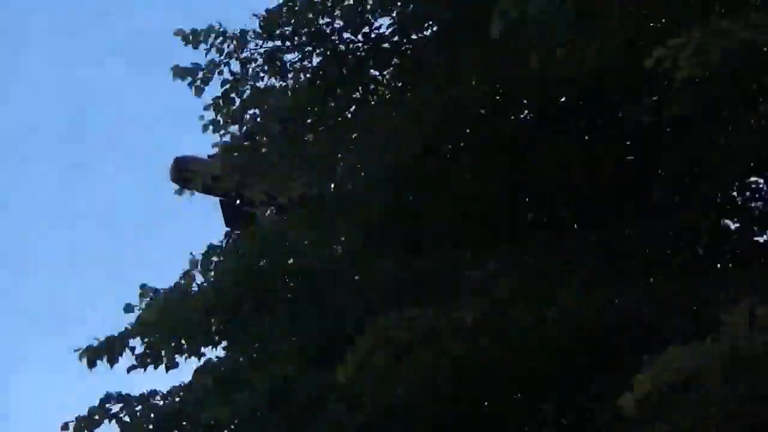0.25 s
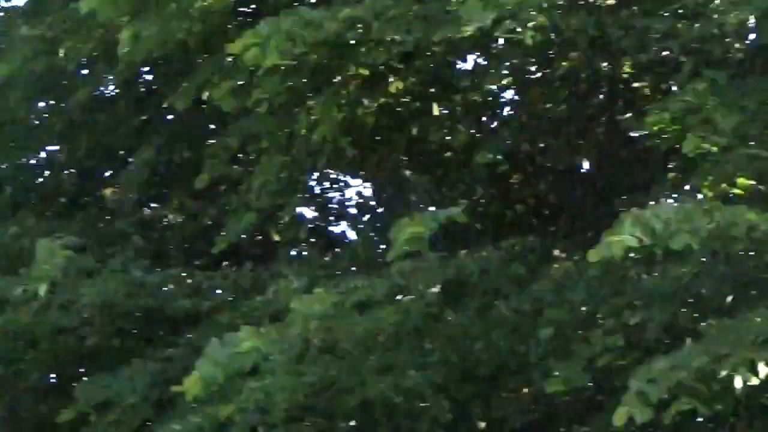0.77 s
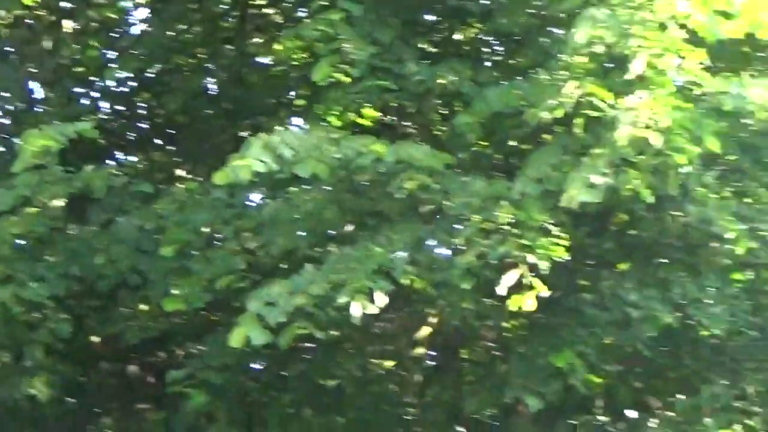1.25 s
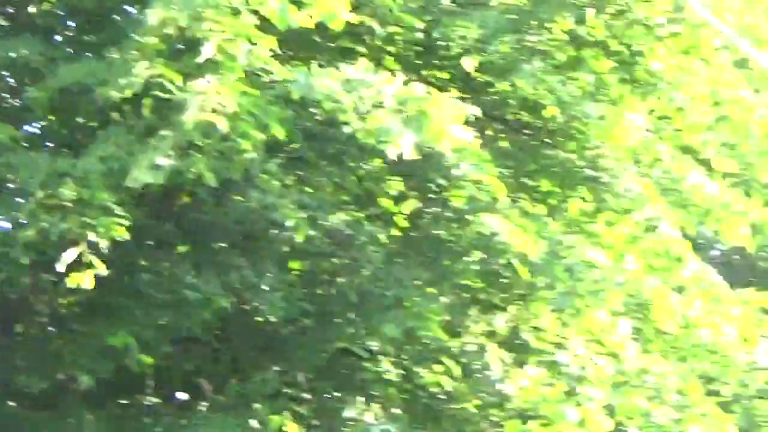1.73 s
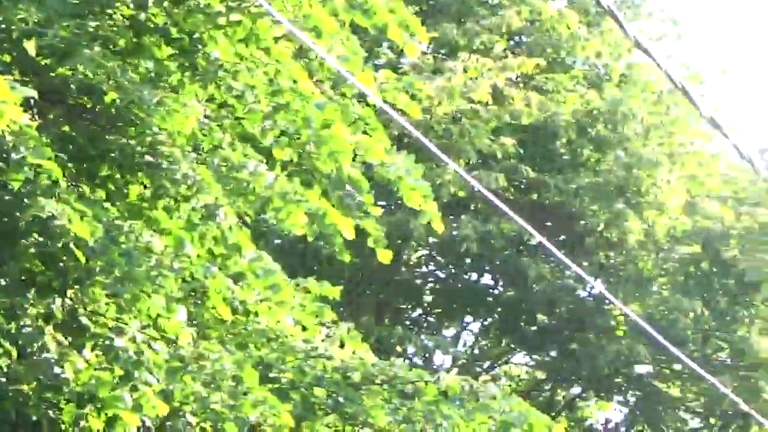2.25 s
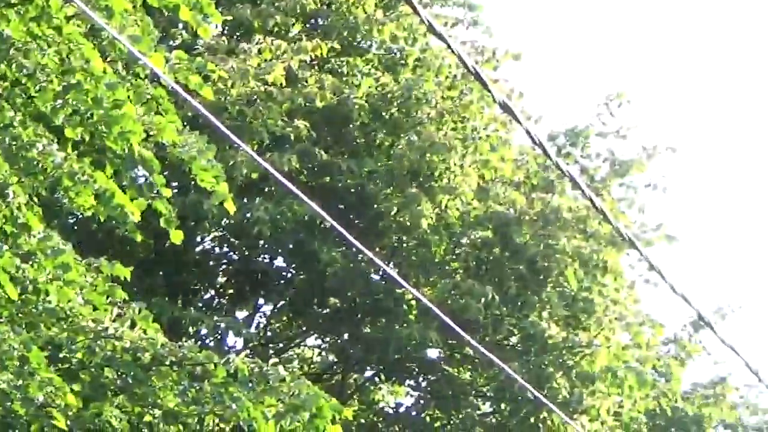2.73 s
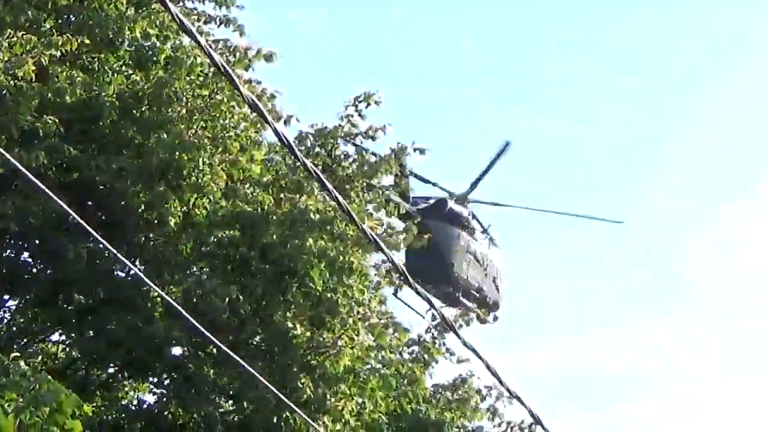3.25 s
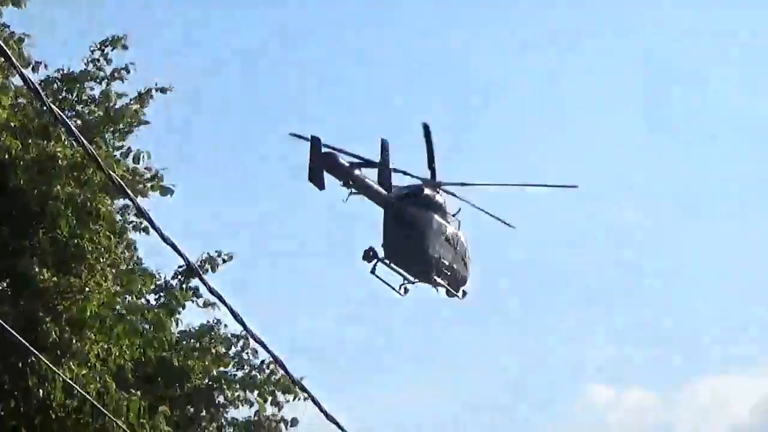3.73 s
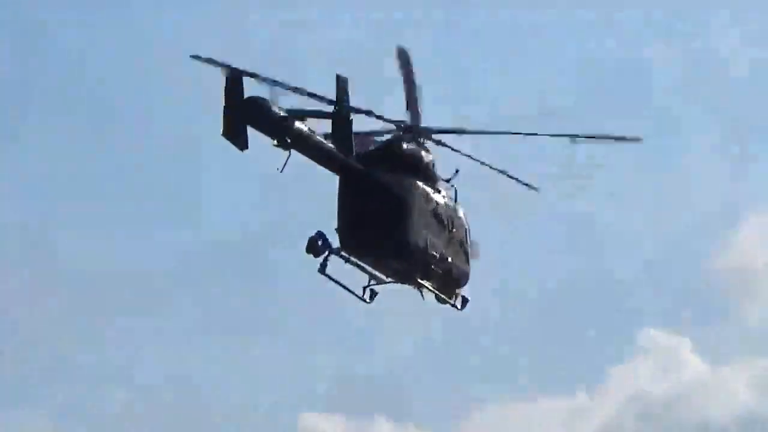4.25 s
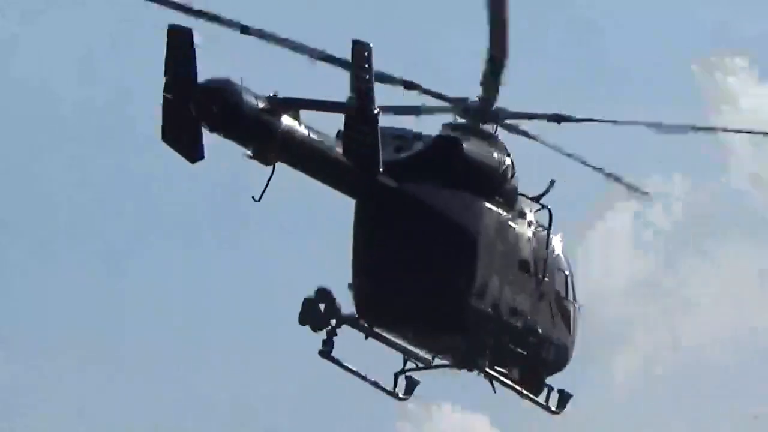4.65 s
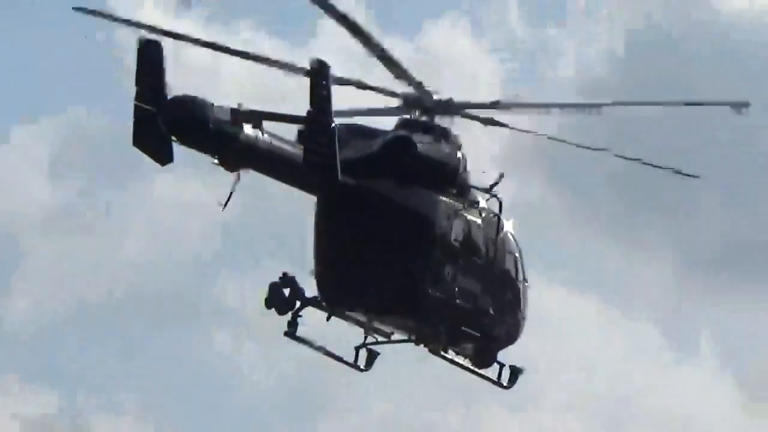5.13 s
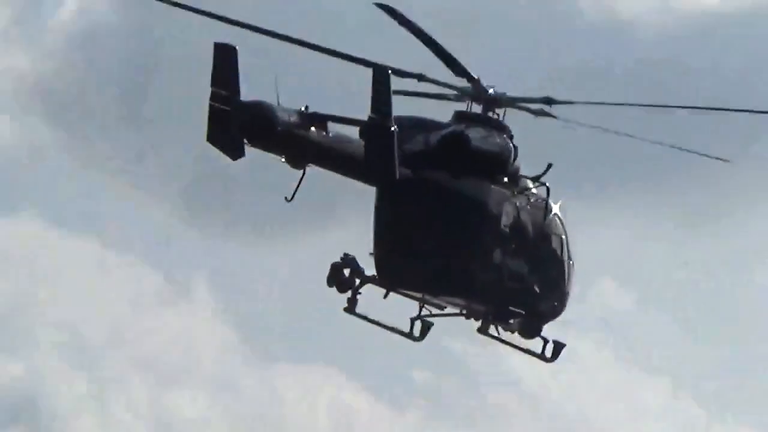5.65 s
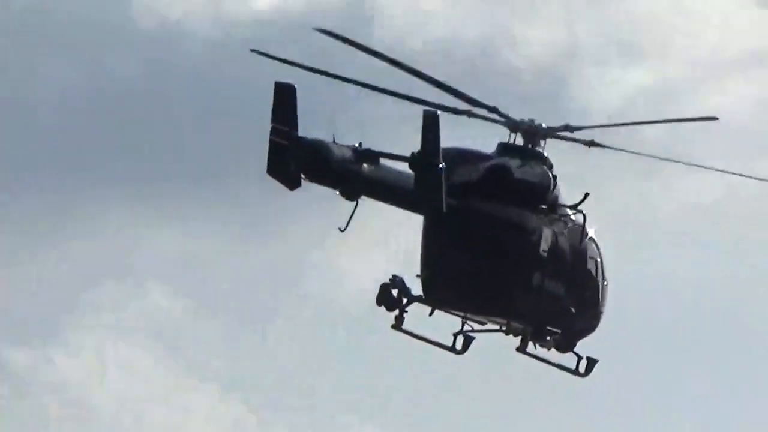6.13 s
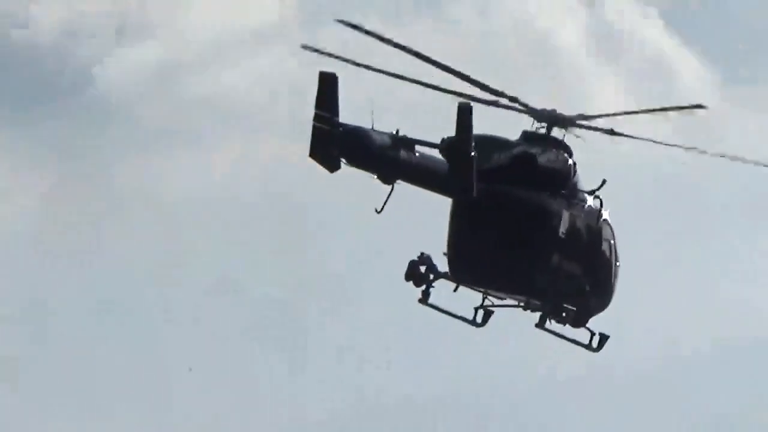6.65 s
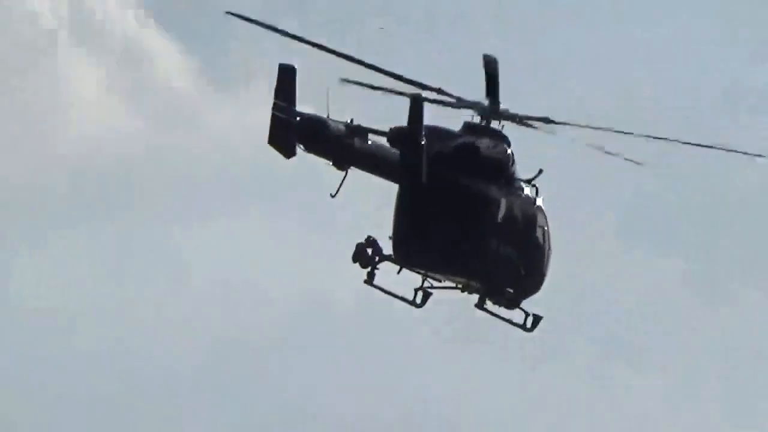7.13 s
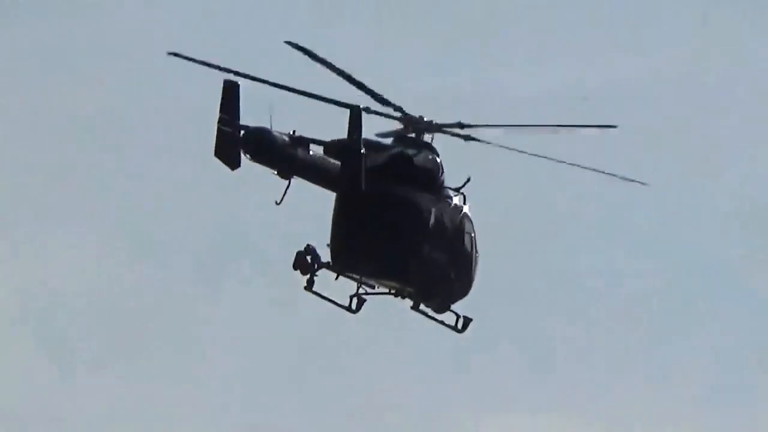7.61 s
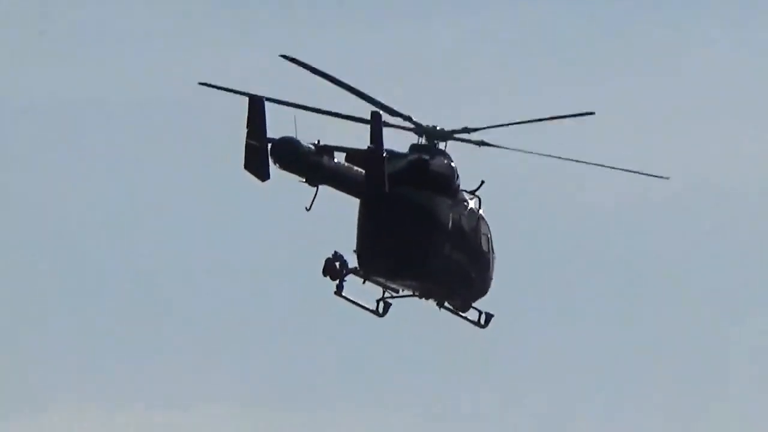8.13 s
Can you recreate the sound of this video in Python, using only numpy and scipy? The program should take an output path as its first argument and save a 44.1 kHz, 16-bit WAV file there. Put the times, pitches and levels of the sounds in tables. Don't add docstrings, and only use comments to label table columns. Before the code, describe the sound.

Outdoors, a small handheld stereo camera catches a departing helicopter. A sharp hiss at once dulls behind trees, leaving a rushing midrange roar with fast blade throb and a slowly sinking, flickering whine. Hiss and a faint whistle open up near four seconds. The roar then drops away, lingering softly among houses, while the whine twinkles in and out to the end.

```python
import sys
import numpy as np
from scipy import signal
from scipy.fft import rfft, irfft, next_fast_len
from scipy.io import wavfile
from scipy.ndimage import uniform_filter1d

SR = 44100
rng = np.random.default_rng(int(sys.argv[2]) if len(sys.argv) > 2 else 0)


def int16_out(signal):
    q = np.round(np.clip(np.atleast_2d(signal).T, -1, 1) * 32767)
    wavfile.write(sys.argv[1], SR, q.astype(np.int16))


def volts_from_decibels(level):
    exponent = np.asarray(level, float) / 20
    return 10 ** exponent


N = 369116
TIME = np.arange(N) / SR
SIZE = next_fast_len(N)

# [t/s, level/dB]
ROTOR = [(0, -26), (.3, -23), (.56, -22), (.9, -24.5), (1.42, -28.5), (1.9, -23), (2.2, -25), (2.45, -23.5),
         (2.8, -27.5), (3.05, -26.5), (3.4, -30), (4.2, -34.5), (5.1, -43.5), (5.7, -40), (6.9, -39.5),
         (7.6, -46), (8.37, -44)]
# [t/s, level/dB]
TURBINE = [(0.0, -31.5), (0.09, -30), (0.65, -45), (1.96, -51), (2.58, -52), (3.12, -46), (3.45, -45),
           (3.71, -39), (3.98, -44.5), (4.64, -48), (5.06, -53), (5.57, -52), (5.71, -48), (5.85, -53),
           (7.08, -53), (7.51, -60), (8.21, -59.5), (8.37, -59.5)]
ROTOR_MEAN_DB, TURBINE_MEAN_DB = -34, -49.5
MIDWAY_S, FAR_FROM_S = 4.2, 5.5
# [lower f/Hz, upper f/Hz]
REGIONS = [(25, 140), (180, 450), (450, 1000), (1300, 2100), (2450, 3200), (4800, 6500), (7500, 10800)]
# [midway level/dB, share of rotor swings, share of turbine swings,
# loss/(dB/s), further loss once far/(dB/s)]
FOLLOWS = [(-60, 0.12, .05, 1.25, .01), (-41.5, 0.48, .01, 1.5, -1.4), (-35, 1, .01, 0.17, -0.1),
           (-35, 0.52, 0.19, 0.33, 1), (-40, 0.16, 0.45, 0.67, 0.17), (-50, 0.025, 1.09, -0.1, -1.1),
           (-54, 0.005, 1.3, 0.31, 1.5)]
# [t/s, level/dB, length/s, centre f/Hz]
EDDIES = [(.45, 3.5, 0.2, 1100), (1.198, 3, 0.23, 300), (1.344, 1.5, 0.16, 1100), (2.25, -3, .08, 300),
          (2.78, -3, .07, 6000), (2.96, 2, 0.059, 8000), (3.015, 3.5, 0.048, 600),
          (3.202, 2.5, 0.064, 1700), (3.32, 3, .07, 9000), (3.7, -1.5, .06, 8000), (3.848, -3, 0.078, 9000),
          (3.92, -2, .07, 300), (4.15, 4.5, 0.11, 300), (4.333, 2.5, .1, 8000), (4.6, 2.5, 0.17, 1800),
          (4.66, 3, .06, 8000), (4.95, 0.5, 0.08, 1700), (5.59, 3.5, 0.07, 1700), (5.75, -3.5, .07, 2000),
          (6.25, 2.5, .1, 7000), (6.598, -4.5, 0.17, 300), (6.8, -3, .08, 6000), (7.12, 3.5, 0.22, 2090),
          (8.05, -2.5, 0.1, 2000), (0.288, -3, 0.21, 2940), (4.28, 1, .1, 1100), (2.4, -1, 0.12, 1800),
          (7.55, 3.5, .1, 300)]
EDDY_OCTAVES = 0.76
# [f/Hz, density level/dB]
NOISE_COLOUR = [(35, -41.5), (140, -19.5), (200, -16), (325, -0.5), (440, -8), (610, 1.5), (790, -3),
                (1050, -3.5),
                (1520, -5), (1830, -8), (2600, -12.5), (4000, -18), (6500, -24), (9000, -22), (11000, -28.5)]
# [f/Hz, side minus mid level/dB]
WIDTH = [(30, -14), (100, -1.5), (250, -16.5), (500, -16.5), (1500, -15), (4000, -12.5), (6500, -8.5),
         (10000, -14.5)]
# [t/s, added side level/dB]
BASS_WIDTH = [(0, 4), (1, 5), (2.5, -0.5), (4, -5), (5, -14), (8.37, -14)]
# [f/Hz, side share a quarter turn off the middle]
PORT_LEAD = [(80, 0), (260, -0.26), (700, -0.024)]
# [t/s, depth in the mids/dB]
THROB = [(0, .8), (1, 1.2), (3, 1.1), (4, .5), (8.37, .4)]
# [t/s, lag/ms, strength of its lows (0-1), strength of its mids (0-1)]
GROUND = [(0, 3.93, 0.45, .2), (.8, 3.83, 0.47, 0.34), (1.4, 3.56, 0.55, 0.1), (2, 3.43, 0.52, 0.1),
          (3, 3.24, 0.64, .4), (3.5, 3.02, .75, .45), (4, 2.94, 0.5, 0.54), (4.5, 2.6, 0.4, 0.5),
          (5, 2.49, .2, 0.7), (5.4, 2.18, 0.47, 0.1), (5.9, 2, 0.2, 0), (7, 2.25, .01, .07),
          (8.37, 1.74, 0, .1)]
GROUND_SPLIT_HZ, GROUND_TOP_HZ = 1050, 2400
# [multiple of the blade rate, level over the rumble/dB]
THUMP = [(1, -17), (2, -14.5), (3, -7.5), (4, -10), (7, 0)]

# [t/s, f/Hz]
FAN_PITCH = [(0, 1165.7), (1.6, 1137), (2.0, 1133.7), (2.5, 1133), (2.8, 1130.9), (3.2, 1124.4),
             (3.6, 1119.7), (4.4, 1115.9), (5.6, 1107), (6.8, 1104.9), (7.2, 1101.6), (8.37, 1097)]
FAN_PER_BLADE = 35.85
# [harmonic, smear f/Hz, smeared share (0-1)]
FAN_SMEAR = [(1, 6, .18), (2, 15, .32), (3, 14, .7)]
# [t/s, peak level/dB, length/s]
FLARES_1 = [(.42, -37, 0.11), (1.156, -35, .08), (1.38, -41, 0.11), (1.66, -30.5, .09),
            (1.827, -24.5, 0.073), (2.097, -29.5, 0.15), (2.643, -28.5, 0.14), (3.04, -27, 0.14),
            (3.677, -30, 0.16), (4.153, -31.5, 0.16), (4.438, -33.5, .1), (4.753, -38, 0.064),
            (5.045, -44.5, 0.091), (5.95, -43, 0.14), (6.686, -42.5, 0.079), (6.996, -39.5, .08),
            (7.254, -45, .1), (7.564, -45.5, 0.14), (8.145, -40, 0.046)]
# [t/s, peak level/dB, length/s]
FLARES_2 = [(.13, -35, 0.06), (.58, -34, 0.065), (.8, -32.5, 0.051), (1.1, -41, 0.084), (1.8, -33.5, 0.17),
            (2.53, -37, 0.046), (2.8, -47, 0.084), (3.12, -30.5, 0.11), (3.3, -32.5, 0.083),
            (3.45, -31.5, 0.12), (3.78, -35.5, 0.15), (4.33, -39.5, 0.091), (4.62, -34.5, 0.14),
            (5.08, -44, 0.15), (5.36, -45, .1), (5.67, -35, 0.19), (6.12, -43.5, 0.14), (6.44, -34, 0.14),
            (6.71, -32, 0.099), (7.0, -32, 0.095), (7.2, -40, 0.12), (7.4, -36.5, 0.074),
            (7.6, -41.5, 0.055), (7.75, -40, 0.058), (7.9, -47, .06), (8.15, -46, .08), (8.3, -47, .08)]
# [t/s, peak level/dB, length/s]
FLARES_3 = [(.1, -38.5, .2), (1.0, -49, .1), (1.4, -52, .12), (1.82, -53, 0.11), (2.24, -48, 0.054),
            (3.1, -42, 0.082), (3.4, -53, 0.11), (3.78, -38, 0.14), (4.3, -48, 0.4), (5.5, -51, .12),
            (5.85, -42.5, 0.057), (7.0, -48, 0.18), (7.4, -48, .1), (8.15, -51, 0.068)]
FAN_UNDER_DB = [-13, -8, -11]
# [t/s, level/dB]
CHOP = [(0, -50), (1.7, -52), (2.0, -36), (2.4, -47), (2.95, -43), (3.3, -56), (4.4, -52), (6.0, -51.5),
        (6.9, -42), (7.5, -45), (7.9, -50), (8.37, -48)]
# [blade rates from the whine, level over the first/dB]
SIDE_LINES = [(2, -7), (3, -10), (-1, -8), (-2, -7)]
# [t/s, f/Hz]
WHISTLE_PITCH = [(0, 4575), (1.5, 4505), (3, 4485), (4.5, 4440), (6, 4430), (8.37, 4390)]
# [t/s, peak level/dB, length/s]
WHISTLE_FLARES = [(1.15, -47, .1), (3.92, -39.5, 0.06), (4.62, -48, .1), (7.0, -58, 0.18)]
# [multiple of the fan pitch, level over the first/dB]
UPPER_WHISTLE = (5.13, -4.5)
# [t/s, peak level/dB, length/s]
GEAR_FLARES = [(1.3, -39, .4), (3.3, -38.5, 0.17), (4.2, -51, .3), (5.5, -45, 0.27), (6.2, -51, 0.33)]
GEAR_PER_FAN = 1.206

# [f/Hz, width/Hz, level/dB]
YARD_MODES = [(349, 15, -3.5), (573, 94, -6)]
# [t/s, level/dB]
YARD_LEVEL = [(0, -45), (3.4, -45), (4.6, -39.5), (5.5, -47.5), (7, -49.5), (8.37, -49)]
# [t/s, level/dB, f/Hz, length/s]
BUMP = (6.36, -53, 65, .035)
# [t/s, left minus right level/dB]
PAN = [(0.0, -1), (0.86, -1.0), (2.28, -1), (2.84, -1.5), (4.31, -1), (6.81, -1), (8.37, -0.5)]
# [f/Hz, left minus right level/dB]
CAPSULES = [(60, 3), (110, 0), (190, 1), (350, -0.5), (1130, -0.5), (2020, 0.5), (3630, 0), (11700, 0.5)]


def curves(table):
    s, *columns = np.transpose(table)
    return np.array([np.interp(TIME, s, column) for column in columns])


def at_hz(table, hz):
    f, value = np.transpose(table)
    return np.interp(np.log(hz), np.log(f), value)


def walk(rate):
    k = int(SR / rate)
    held = np.repeat(rng.standard_normal(int(N / 200))[:N // k + 1], k)
    slewed = uniform_filter1d(uniform_filter1d(held, k), k)[:N]
    return slewed / slewed.std()


def bell(s, length):
    return np.exp(-((TIME - s) / length) ** 2)


def flares(rows, bed_db):
    return np.sqrt(volts_from_decibels(2 * bed_db) + sum(volts_from_decibels(2 * db) * bell(s, length) for s, db, length in rows))


def tone(phase, smear_hz, share):
    step = 16
    pole = np.exp(-2 * np.pi * smear_hz * step / SR)
    draws = rng.standard_normal((2, N // step + 1))
    slow = signal.lfilter([np.sqrt((1 - pole ** 2) / 2)], [1, -pole], draws)
    re, im = (np.interp(np.arange(N) / step, np.arange(len(c)), c) for c in slow)
    in_phase = np.sqrt(1 - share) + np.sqrt(share) * re
    quadrature = np.sqrt(share) * im
    return np.sqrt(2) * (in_phase * np.cos(phase) - quadrature * np.sin(phase))


def region_levels():
    rotor = curves(ROTOR)[0] - ROTOR_MEAN_DB
    turbine = curves(TURBINE)[0] - TURBINE_MEAN_DB
    far = np.maximum(TIME - FAR_FROM_S, 0)
    levels = np.array([db + a * rotor + b * turbine - loss * (TIME - MIDWAY_S) - more * far
                       for db, a, b, loss, more in FOLLOWS])
    centres = np.sqrt(np.prod(REGIONS, axis=1, keepdims=True))
    for s, db, length, hz in EDDIES:
        spread = np.exp(-(np.log2(centres / hz) / EDDY_OCTAVES) ** 2)
        levels = levels + db * spread * bell(s, length)
    return levels


def roar(blade, levels):
    hz = np.maximum(np.fft.rfftfreq(SIZE, 1 / SR), 1)
    colour = volts_from_decibels(at_hz(NOISE_COLOUR, hz))
    gains_db = levels - [[10 * np.log10(np.sum(colour[(hz > lo) & (hz < hi)] ** 2) * 2 / SIZE)]
                         for lo, hi in REGIONS]
    places = np.log([np.sqrt(lo * hi) for lo, hi in REGIONS])
    noise = rfft(rng.standard_normal((2, SIZE))) * colour
    noise[1] *= volts_from_decibels(at_hz(WIDTH, hz))
    noise[1] += 1j * at_hz(PORT_LEAD, hz) * noise[0]
    beat = np.cos(blade + .45)
    throb_db = curves(THROB)[0] * beat
    wide_db = curves(BASS_WIDTH)[0]
    gust, flutter = walk(3.24), walk(14.)
    out = 0
    for centre in 25 * 2 ** (np.arange(28) / 3):
        window = np.cos(np.clip(3 * np.log2(hz / centre), -1, 1) * np.pi / 2) ** 2
        place = np.interp(np.log(centre), places, np.arange(len(REGIONS)))
        k = min(int(place), len(REGIONS) - 2)
        db = gains_db[k] + (place - k) * (gains_db[k + 1] - gains_db[k])
        treble = min(centre / 3200.0, 1)
        db = db + treble * (.5 * gust + 0.8 * flutter) + 1.26 * walk(9.)
        db = db + (throb_db * min(centre / 600, 1) if centre < 2200 else .6 * beat)
        bass = np.clip(np.log2(900 / centre) / 2, 0, 1)
        gain = volts_from_decibels(np.array([db, db + bass * wide_db]))
        out = out + gain * irfft(noise * window, SIZE)[:, :N]
    return out


def ground_echo(x):
    lag_ms, lows, mids = curves(GROUND)
    lag = (lag_ms + .015 * walk(6.)) * SR / 1000
    late = np.array([np.interp(np.arange(N) - lag, np.arange(N), c) for c in x])
    low, dull = (signal.sosfiltfilt(signal.butter(2, hz, fs=SR, output="sos"), late)
                 for hz in (GROUND_SPLIT_HZ, GROUND_TOP_HZ))
    echo = lows * low + mids * (dull - low)
    return (x + echo) / np.sqrt(1 + 0.4 * (lows ** 2 + mids ** 2))


def rotor_thump(blade, rumble_db):
    return sum(volts_from_decibels(rumble_db + db) * tone(round(k) * blade, 1.5, .6) for k, db in THUMP)


def fan_harmonics(phase, levels):
    _, _, low_db, mid_db, high_db, _, _ = levels
    out = 0
    for (k, smear_hz, share), rows, around_db, under_db in zip(
            FAN_SMEAR, (FLARES_1, FLARES_2, FLARES_3), (low_db, mid_db, high_db), FAN_UNDER_DB):
        out = out + flares(rows, around_db + under_db) * tone(k * phase, smear_hz, share)
    return out


def wake_chop(phase, blade):
    chop_db = curves(CHOP)[0] + 2.0 * walk(9.0)
    return sum(volts_from_decibels(chop_db + db) * tone(phase + round(n) * blade, 4., .5)
               for n, db in [(1, 0.005), *SIDE_LINES])


def turbine_whistles(phase, hiss_db):
    bed_db = hiss_db - 5
    multiple, upper_db = UPPER_WHISTLE
    first = 2 * np.pi * np.cumsum(curves(WHISTLE_PITCH)[0]) / SR
    out = flares(WHISTLE_FLARES, bed_db) * tone(first, 32., .92)
    return out + volts_from_decibels(bed_db + upper_db) * tone(multiple * phase, 60., 1.)


def gear_mesh(phase, low_db):
    return flares(GEAR_FLARES, low_db - 16.5) * tone(GEAR_PER_FAN * phase, 8., .7)


def whines(phase, blade, levels):
    lines = fan_harmonics(phase, levels) + wake_chop(phase, blade)
    lines = lines + turbine_whistles(phase, levels[5]) + gear_mesh(phase, levels[2])
    return lines * volts_from_decibels(.15 * TIME * walk(16.))


def hand_bump():
    s, db, hz, length = BUMP
    return volts_from_decibels(db) * bell(s, length) * np.sin(2 * np.pi * hz * (TIME - s))


def yard():
    noise = rng.standard_normal(N)
    out = sum(volts_from_decibels(db) * signal.lfilter(*signal.iirpeak(hz, hz / width, fs=SR), noise)
              for hz, width, db in YARD_MODES)
    return volts_from_decibels(curves(YARD_LEVEL)[0]) * out / out.std()


def scene():
    phase = 2 * np.pi * np.cumsum(curves(FAN_PITCH)[0]) / SR
    blade = phase / FAN_PER_BLADE
    levels = region_levels()
    mid, side = ground_echo(roar(blade, levels))
    whine = whines(phase, blade, levels)
    low = rotor_thump(blade, levels[0])
    mid = mid + whine + low + hand_bump() + yard()
    side = side + volts_from_decibels(-20.5) * np.roll(whine, 700)
    side = side + volts_from_decibels(curves(BASS_WIDTH)[0] - 16) * np.roll(low, 9000)
    pan_db = curves(PAN)[0]
    return np.array([(mid + side) * volts_from_decibels(pan_db / 2), (mid - side) * volts_from_decibels(-pan_db / 2)])


def top_cut(x):
    return signal.sosfilt(signal.butter(12, 12340, fs=SR, output="sos"), x)


def record(dry):
    hz = np.maximum(np.fft.rfftfreq(SIZE, 1 / SR), 1)
    lean_db = at_hz(CAPSULES, hz) + 0.58
    top = np.clip((11060 - hz) / 120, 0, 1)
    rounded = np.tanh(1.1 * dry) / 1.1
    response = top * volts_from_decibels(np.array([lean_db, -lean_db]) / 2)
    mix = irfft(rfft(rounded, SIZE) * response, SIZE)[:, :N]
    return top_cut(mix)


dry = scene()
out = record(dry)
int16_out(out)
```